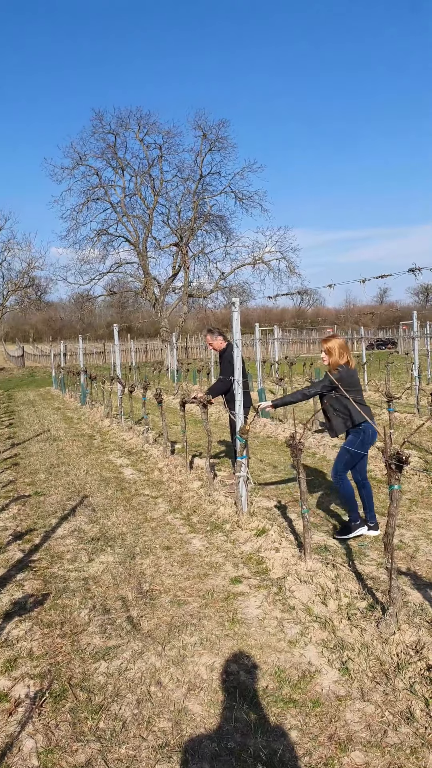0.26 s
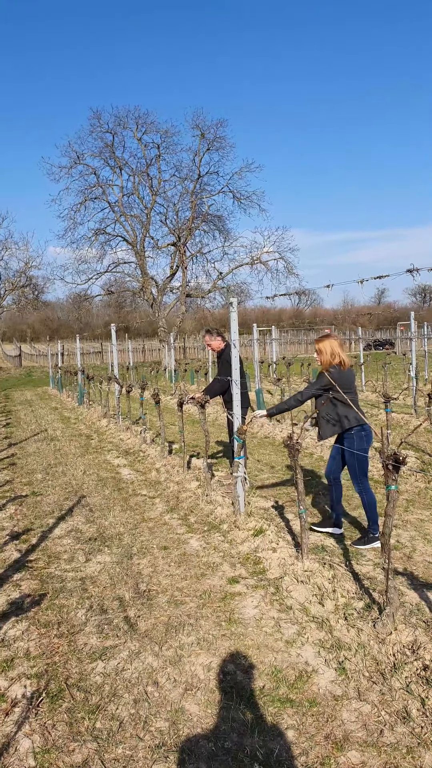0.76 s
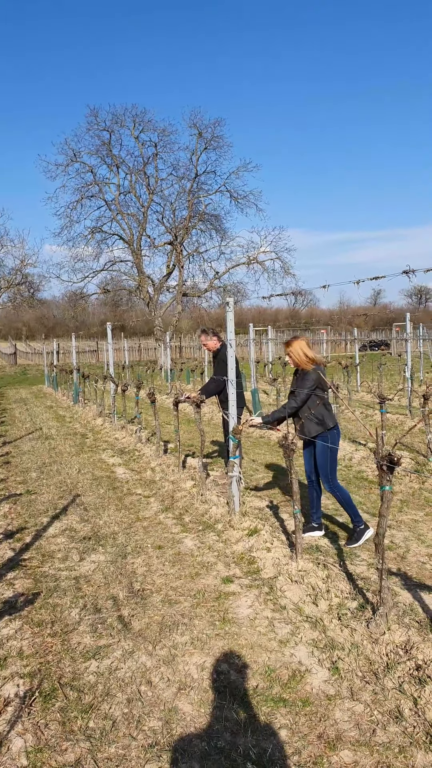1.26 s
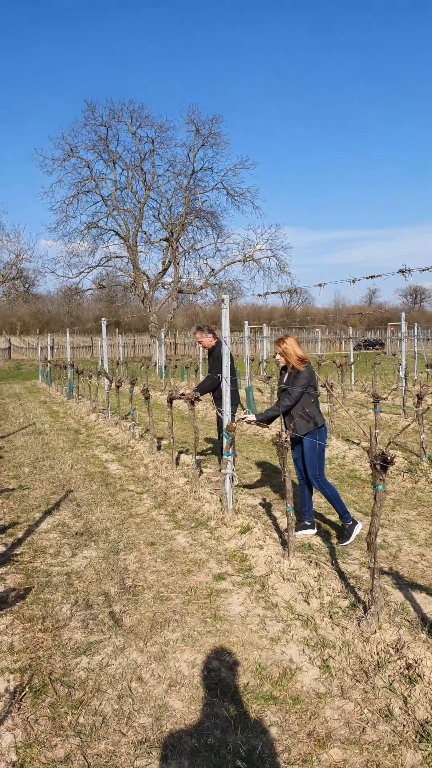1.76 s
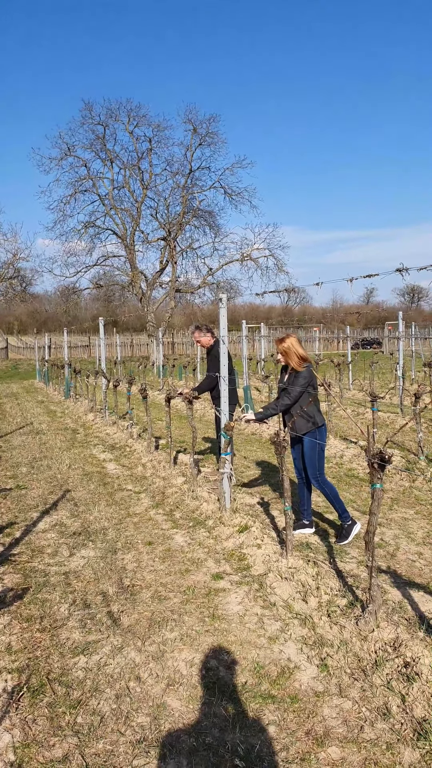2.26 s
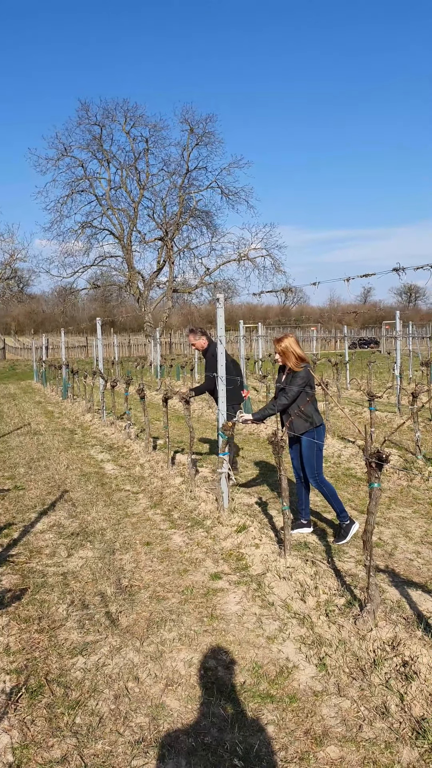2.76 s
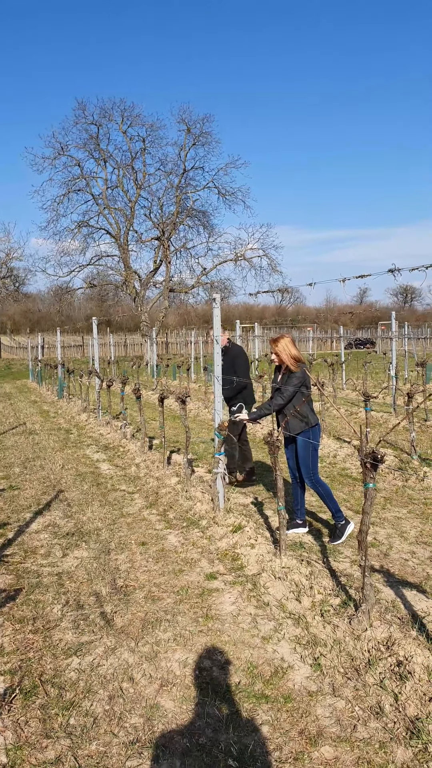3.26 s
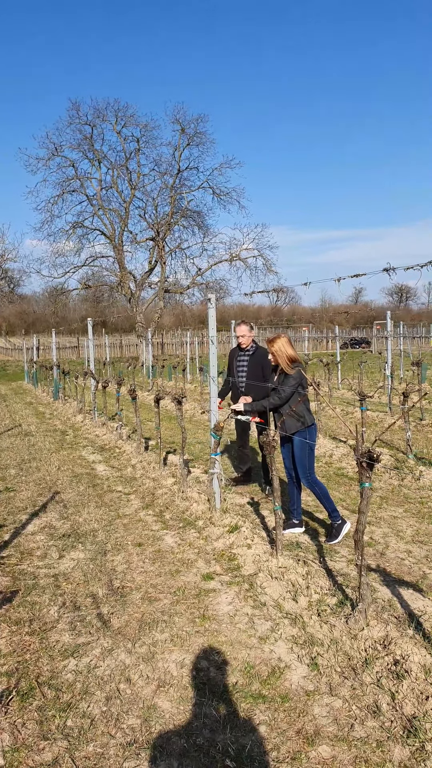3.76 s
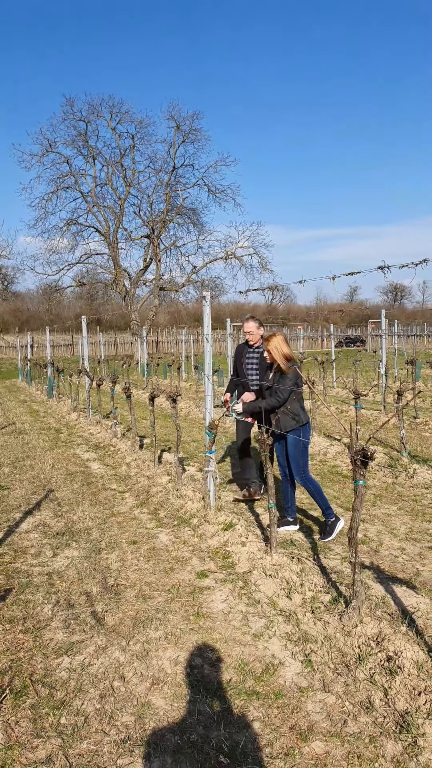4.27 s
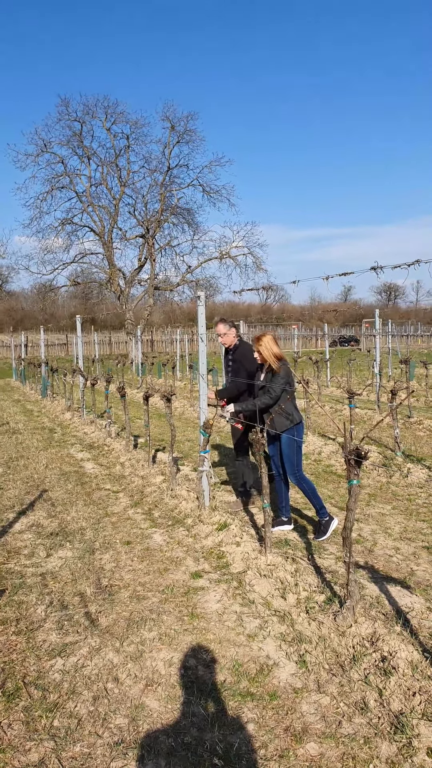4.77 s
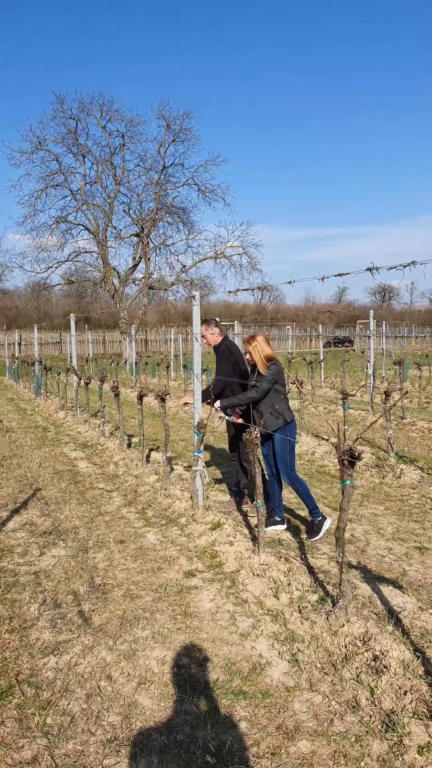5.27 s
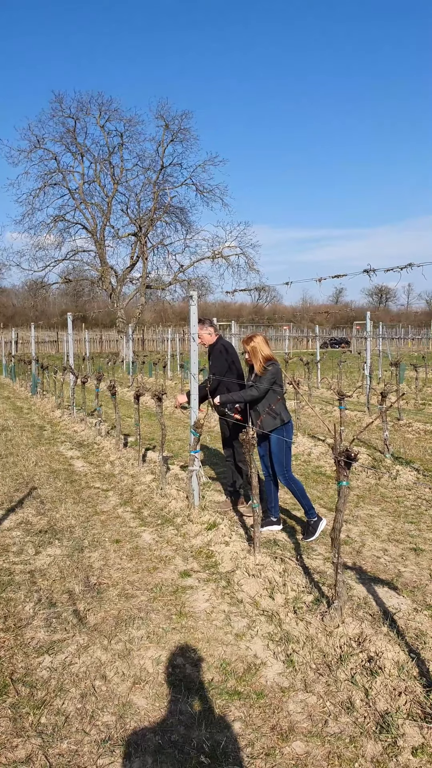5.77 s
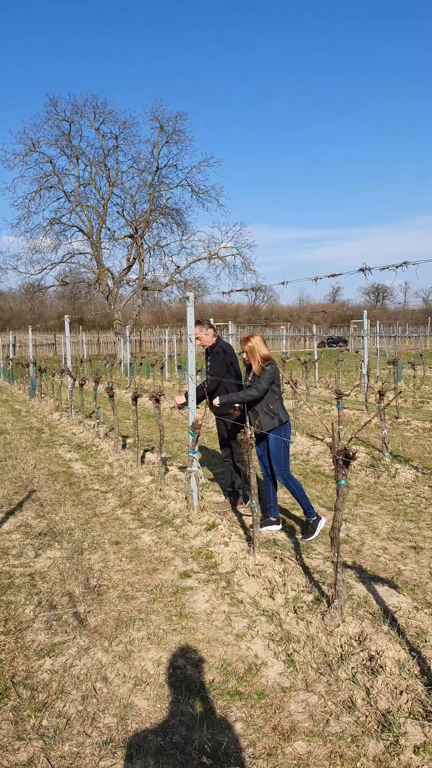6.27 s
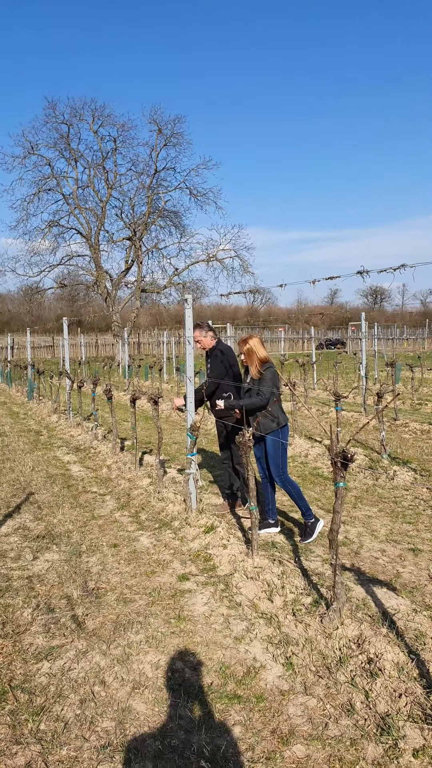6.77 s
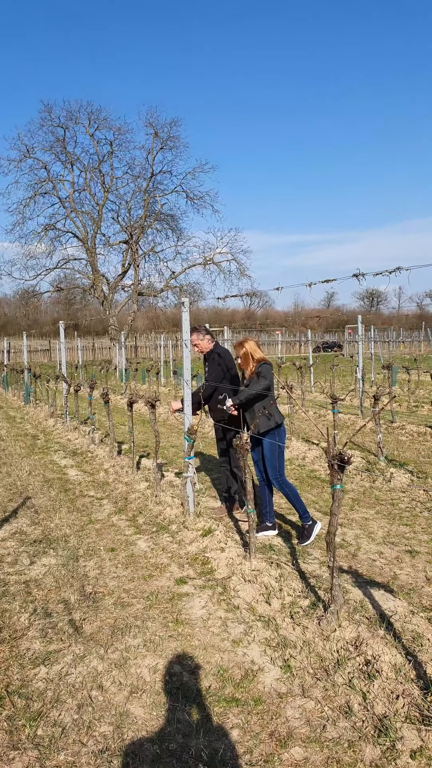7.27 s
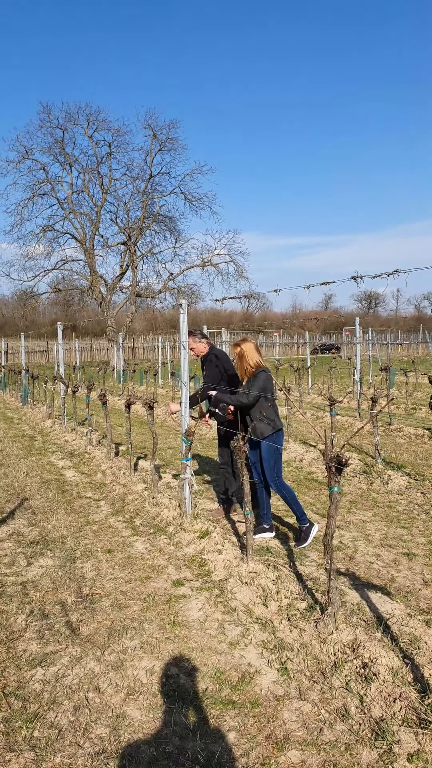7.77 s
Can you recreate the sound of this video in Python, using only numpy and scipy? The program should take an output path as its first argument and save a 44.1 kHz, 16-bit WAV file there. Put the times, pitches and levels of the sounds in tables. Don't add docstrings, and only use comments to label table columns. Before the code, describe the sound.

In an open vineyard, hand shears a few metres away cut dry canes: fibres crunch, a sharp crack, brief steel ring, short scatter. A cluster of snips comes early amid low wind thumps, then a quieter stretch with light ticks, wire scrapes and a far bird trilling. More snips follow, ending with one loud crack and crackling twigs. Phone microphone, very quiet background.

```python
import sys
import numpy as np
from scipy import signal
from scipy.fft import rfft, irfft, next_fast_len
from scipy.io import wavfile
from scipy.ndimage import uniform_filter1d

SR = 44100
rng = np.random.default_rng(int(sys.argv[2]) if len(sys.argv) > 2 else 0)


def transcribe(u):
    v = np.clip(np.atleast_2d(u).T, -1, 1)
    q = np.round(v * 32767).astype(np.int16)
    wavfile.write(sys.argv[1], SR, q)


def voltage_ratio(level):
    return 10 ** (np.asarray(level, float) / 20)


N = 353241
TIME = np.arange(N) / SR


def unit(x):
    return x / np.sqrt(np.mean(x ** 2))


def noise(shape):
    hz, db = np.transpose(shape)
    size = next_fast_len(N)
    f = np.maximum(np.arange(size // 2 + 1) * SR / size, 1)
    gain = voltage_ratio(np.interp(np.log(f), np.log(hz), db, -150, -150))
    return unit(irfft(rfft(rng.standard_normal(size)) * gain, size)[:N])


def walk(rate):
    k = int(SR / rate)
    held = np.repeat(rng.standard_normal(N // k + 1), k)
    return unit(uniform_filter1d(held, k)[:N])


def highpass(x, order, hz):
    return signal.sosfiltfilt(signal.butter(order, hz, "high", fs=SR, output="sos"), x)


def curve(points):
    return np.interp(TIME, *np.transpose(points))


def swells(rows, rise_db_s, fall_db_s):
    t = np.arange(0, N / SR, 1 / 1000)
    s, hold, db = np.array(rows)[:, :3].T[:, :, None]
    climb = rise_db_s * np.maximum(s - t, 0)
    fall = fall_db_s * np.maximum(t - s - hold, 0)
    return voltage_ratio(2 * (db - climb - fall))


def smooth(power):
    return np.interp(TIME, np.arange(len(power)) / 1000, np.sqrt(power))


# frequency in Hz, lead in radians.
PORT_PHASE = [(400, -0.46), (1300, -1.3), (2500, -0.8), (4000, -1.6), (8000, -0.75), (13000, -2.4)]
# frequency in Hz, left minus right in dB.
PORT_TILT = [(500, 6.5), (1200, 5), (2500, -7), (7000, -1), (13000, -4.5)]


def placed(x, pan_db):
    size = next_fast_len(N)
    f = np.log(np.arange(size // 2 + 1) * SR / size + 1)
    phase_hz, phase = np.transpose(PORT_PHASE)
    tilt_hz, tilt_db = np.transpose(PORT_TILT)
    lead = np.exp(1j * np.interp(f, np.log(phase_hz), phase))
    tilt = voltage_ratio(np.interp(f, np.log(tilt_hz), tilt_db))
    left = irfft(rfft(x, size) * tilt * lead, size)[:N]
    return np.array([left * voltage_ratio(pan_db / 2), x * voltage_ratio(-pan_db / 2)])


def unrelated(x):
    return np.array([np.roll(x, N // 3), np.roll(x, N // 5)])


# time in seconds, crack peak in dB, wood and blade in dB
# relative to the crack, decay t60 in seconds.
CUTS = [(1.51, -41.5, -14, 1.5, 0.025), (1.5729, -22.5, -11, -7.5, 0.024), (1.5965, -16.5, -18, -7, 0.026),
        (1.9785, -30, -25, -6, 0.034), (2.0194, -37, -19, -3.5, 0.021), (2.2215, -27, -15, -4, 0.036),
        (2.4724, -40.5, -18.5, 1.5, 0.081), (2.5139, -28.5, -9.5, 5.5, 0.059), (2.607, -17, -16, -3, 0.051),
        (2.6254, -20.5, -28, -17, .013), (3.016, -34.5, -19.5, -8, 0.036), (5.022, -30, -19, -16, 0.032),
        (6.057, -40, -11.5, 1, 0.046), (6.1077, -40.5, -17.5, -18, 0.063), (6.136, -38.5, -26, -8, 0.035),
        (6.2691, -20, -18, 1, 0.033), (6.395, -37, -21.5, -8, 0.038), (6.6809, -38.5, -25, 0.5, 0.06),
        (6.69, -35, -22.5, -2, 0.02), (7.2558, -30, -26, -1.5, 0.025), (7.263, -28.5, -18, -5, 0.04),
        (7.3383, -26.5, -9, -4, 0.045), (7.6528, -37, -15, 1.5, 0.078), (7.8025, -13, -18.5, -8, 0.03)]
CUT_EDGE_DB = [4, 3, -2, -1, -1, -2.5, -5, 2, -1, -2.5, -1.5, -7, -7.5, -3, -1, -0.5, -2.5, -1, 2.5, 2.5,
               -0.5, -1, -3, 4]
# time in seconds, crack peak in dB,
# decay t60 in seconds, scatter in dB relative to the crack.
TAPS = [(.744, -47, 0.047, -19), (1.5224, -49.5, 0.038, -10.5), (2.1924, -58, 0.024, -30.5),
        (2.5745, -48.5, 0.068, -23), (3.6677, -54.5, 0.072, -19), (3.7469, -58.5, 0.044, -28),
        (4.546, -49.5, 0.065, -16.5), (4.9598, -52.5, 0.025, -10), (4.9957, -65, 0.03, 12.5),
        (5.4098, -51.5, 0.014, -10), (6.7657, -48.5, 0.086, -48), (7.2336, -61.5, 0.021, -18),
        (7.3025, -48, 0.076, -24), (7.5788, -63, 0.045, -25), (7.5938, -43, 0.043, -26),
        (7.6894, -48.5, 0.034, -24), (7.7938, -44, 0.021, -2)]
TICKS = [(2.216, -37, .03, -22), (1.972, -36, .035, -22), (4.941, -62, .06, -15), (5.393, -66, .06, -15),
         (.8794, -45, 0.035, -19), (3.822, -52, 0.0097, -31), (4.252, -69.5, 0.037, -2),
         (5.012, -49, .02, -15), (4.636, -52, .015, -24), (7.522, -71.5, 0.043, -7),
         (1.1093, -48, 0.023, -19.5), (1.6681, -41.5, 0.014, -23.5), (4.6994, -51, 0.037, -11),
         (6.0403, -47, 0.028, -24), (7.1154, -51, 0.024, -19), (7.1269, -51.5, 0.13, -15),
         (7.1578, -44.5, 0.042, -24), (7.1744, -45, 0.06, -27), (7.954, -42, 0.068, -14.5)]
SPLINTERS = [
    (1.5765, -25.5, .012, -39.5),
    (1.565, -44.5, .03, -30),
    (2.7057, -67, 0.11, -15),
    (2.7525, -50.5, 0.019, -18),
    (2.8325, -54, 0.058, -11.5),
    (2.896, -56.5, 0.016, -32),
    (3.0644, -51, 0.034, -37),
    (5.749, -72, 0.01, -6),
]
# time in seconds, crack peak in dB.
CRACKLES = [(.2344, -74), (.2794, -78), (.5994, -77.5), (.7333, -60), (.870, -60), (0.898, -51.5),
            (2.698, -56), (2.7144, -54), (2.726, -55), (2.7364, -64), (2.7446, -59), (2.761, -63),
            (2.8463, -55), (3.69, -69), (3.79, -70), (3.855, -65), (3.92, -67.5), (4.3842, -82.5),
            (4.4944, -74), (4.560, -57), (4.5714, -64), (4.656, -63), (5.06, -54), (5.174, -70.5),
            (5.9623, -60.5), (6.364, -55), (7.5663, -70), (7.604, -55), (7.7223, -58.5), (7.76, -56),
            (7.771, -61), (7.783, -56), (7.8437, -44), (7.8577, -43.5), (7.875, -41), (7.883, -42.5),
            (7.897, -48.5), (7.9044, -50), (7.9104, -53.5)]


def contacts():
    rows = []
    for cut, edge_db in zip(CUTS, CUT_EDGE_DB):
        scatter_db = -26.5 - 0.32 * (cut[1] + 30)
        rows.append((*cut, scatter_db, edge_db))
    for table, wood_db, blade_db in ((TAPS, -9, 1), (TICKS, -30.5, -3), (SPLINTERS, -40, -13.5)):
        rows += [(s, db, wood_db, blade_db, t60, scatter_db, -1.5) for s, db, t60, scatter_db in table]
    return rows + [(s, db, -23.5, -10, 0.026, -23.5, 0.5) for s, db in CRACKLES]


# frequency in Hz, density in dB per Hz.
WOOD = [(260, -45.5), (450, -27.5), (534, -17.5), (967, -14), (1240, -15), (1540, 0.5), (1990, -3),
        (2300, -7.5), (2990, -33.5), (5060, -120)]
BLADE = [(1180, -45.5), (2000, -23), (2270, -7), (2480, -3.5), (2700, 2.5), (2990, -0.5), (3330, -1.5),
         (3700, -7.5), (4810, -46.5), (8140, -120)]
CRACK = [(1940, -31.5), (3300, -4.5), (3630, -17.5), (3930, -2), (4920, -10), (5640, -6), (6320, -2.5),
         (7500, -19), (9750, -46.5), (16500, -120)]
EDGE = [(4240, -36.5), (7200, -9.5), (7590, -8.5), (8400, 3.5), (9980, -3.5), (11700, 2.5), (12900, -4),
        (15800, -10.5), (16700, -46)]
SCATTER_T60 = [0.34, 0.3, 0.24, 0.15]


def snips():
    t = np.arange(int(.4 * SR)) / SR - .012
    age = np.maximum(t, 0)
    blow, tail = np.zeros((2, 4, N + len(t)))
    slow = np.array([[1.5], [1.15], [.95], [.8]])
    scatter = (1 - np.exp(-age / .004)) * voltage_ratio(-60 * age / np.array(SCATTER_T60)[:, None])
    crunch = voltage_ratio(-28 + 1500 * t) * (t < 0)
    for s, db, wood_db, blade_db, t60, scatter_db, edge_db in contacts():
        i = int((s + t[0] - .001) * SR)
        size = voltage_ratio(db - 5 + np.array([[wood_db], [blade_db], [-3], [-3 + edge_db]]))
        rise = 1 - np.exp(-(age / (0.025 * t60)) ** 2)
        crack = rise * voltage_ratio(-60 * age / (slow * t60))
        blow[:, i:i + len(t)] += (size * (crunch + crack)) ** 2
        tail[:, i:i + len(t)] += (size * scatter * voltage_ratio(scatter_db)) ** 2
    out, splinter = 0, unit(voltage_ratio(2 * walk(700)))
    for k, shape in enumerate((WOOD, BLADE, CRACK, EDGE)):
        carrier = noise(shape)
        direct, wide = placed(carrier, -4.0), unrelated(carrier)
        patter = unit(voltage_ratio(3.2 * walk(250)))
        echo = 1.2 * np.roll(direct, N // 2, axis=1) + 0.47 * wide
        out = out + np.sqrt(blow[k, :N]) * splinter * (direct + .2 * wide)
        out = out + np.sqrt(tail[k, :N]) * patter * echo
    return signal.sosfilt(signal.butter(4, 560, "high", fs=SR, output="sos"), out)


# time in seconds, pitch in Hz, level in dB, t60 in seconds.
RINGS = [
    (2.61, 2369, -41, .16),
    (2.61, 2789, -54, .15),
         (1.574, 6673, -27, 0.013), (1.596, 6330, -17.5, 0.011), (1.596, 3205, -23, 0.022),
         (2.479, 11820, -55, .15), (2.518, 11700, -44, 0.05), (5.024, 3414, -44, .04),
         (5.023, 6210, -44, 0.024), (5.525, 6430, -88, .15), (5.75, 6600, -60, 0.02),
         (5.75, 7500, -68, .02), (5.75, 8400, -70, .015), (6.398, 11300, -67, .1),
         (6.69, 11600, -52.5, 0.082), (7.598, 11540, -65.5, 0.1), (7.655, 11660, -53.5, 0.11),
         (7.802, 6004, -18.5, 0.015), (7.803, 2760, -25.5, 0.027), (6.269, 2650, -29.5, 0.03),
         (2.516, 3200, -38, .03), (2.608, 6500, -30, .02), (2.609, 2780, -28, .025),
         (2.624, 6100, -36, .015), (1.6, 2564, -55, 0.26), (2.221, 3050, -36, .025),
         (2.036, 10950, -66, .03), (2.078, 6300, -76, .08), (7.339, 1500, -42, .03), (7.34, 3050, -40, .03),
         (7.263, 2950, -40, .025), (1.978, 6100, -42, .02), (6.4, 2648, -61.5, 0.13)]


def blade_ring():
    age, out = np.arange(SR // 2) / SR, np.zeros(N + SR)
    for s, hz, db, t60 in RINGS:
        fade = (1 - np.exp(-age / 0.00045)) * voltage_ratio(db - 60 * age / t60)
        out[int(s * SR):][:SR // 2] += fade * np.sin(2 * np.pi * hz * age)
    return placed(out[:N] * voltage_ratio(2 * walk(60) + 4.7 * walk(550)), -9.5)


# frequency in Hz, density in dB per Hz.
TWIGS = [(290, -46), (500, -21), (1350, -25), (1540, -1), (2160, -13.5), (2890, -1), (4900, -10.5),
         (6100, -5.5), (7270, -16.5), (8930, -13.5), (15300, -21), (16500, -41.5)]
# start in seconds, hold in seconds, level in dB.
SHAKES = [(0, 0.079, -91.5), (.14, 0.09, -85), (.28, 0.038, -100.5), (.45, 0.065, -91), (.58, 0.041, -93),
          (.93, 0.21, -95.5), (1.58, 0.08, -99), (2.14, 0.082, -102), (2.66, 0.014, -87), (2.92, 0.11, -87),
          (3.68, 0.13, -78), (3.82, 0.11, -85), (4.55, 0.16, -82.5), (5.08, 0.1, -85), (6.0, 0.081, -97),
          (6.27, 0.024, -90.5), (7.27, .04, -72), (7.37, 0.028, -77.5), (7.6, 0.051, -82),
          (7.76, .25, -75.5), (5.78, .06, -104)]
SHAKE_TOP_DB = [-8, -7, -6, -1, -5, -1, -1, -1, -1, -1, -3, 1, -1, -1, -1, -1, -1, -1, -1, -1, 12]


def rustle():
    grains = unit(voltage_ratio(3 * walk(500) + 2 * walk(40)))
    carrier = noise(TWIGS)
    both = placed(carrier, -7.5) + 2.9 * unrelated(carrier)
    top = highpass(both, 4, 4300)
    power = swells(SHAKES, rise_db_s=302, fall_db_s=190)
    stir = voltage_ratio(-107)
    body = smooth(power.sum(axis=0)) + stir
    hiss = smooth(voltage_ratio(2 * np.array(SHAKE_TOP_DB)) @ power) + stir
    return voltage_ratio(-4.5) * grains * (body * (both - top) + hiss * top)


# frequency in Hz, width in Hz, level in dB.
WIRE = [(700, 45, -15), (1300, 110, -10), (1600, 45, 2.5), (3460, 50, -3), (5380, 40, -12)]
# start in seconds, hold in seconds, level in dB, then the
# fourth and fifth modes in dB relative to the third.
DRAGS = [(0.686, 0.035, -70, -12, -25), (2.175, 0.03, -69, -3, -25), (2.586, 0.034, -61, -8, -11.5),
         (3.668, 0.022, -76.5, -1, 13), (3.749, 0.021, -65.5, 5, -10), (3.796, 0.035, -67, -3.5, -4.5),
         (4.259, 0.053, -69, -3.5, -15.5), (4.551, 0.036, -75.5, -5.5, -8.5),
         (4.638, 0.036, -80.5, -6, -7.5), (4.699, 0.05, -71.5, 8, 7), (4.943, 0.052, -67.5, -7.5, -1),
         (5.169, 0.052, -82.5, -11, -12), (5.407, 0.015, -54, -6, -8.5), (7.349, 0.072, -75, 0.5, -10),
         (7.516, 0.045, -89, 7.5, -16), (7.76, 0.03, -67.5, -5.5, -11.5), (7.808, 0.07, -64, -12, -8),
         (7.968, 0.014, -73.5, -6.5, -10)]
DRAG_LOW_DB = [-14, -1, -1, -1, -1, -1, -1, 3, -1, -1, -1, -1, -1, -1, -1, -1, -1, -1]


def wire():
    power, out = swells(DRAGS, rise_db_s=3000, fall_db_s=700), 0
    mix_db = np.vstack([DRAG_LOW_DB, DRAG_LOW_DB, np.zeros(len(DRAGS)), np.array(DRAGS)[:, 3:].T])
    jerks = unit(voltage_ratio(4.5 * walk(300)))
    for (hz, width, db), mix in zip(WIRE, mix_db):
        slip = jerks * rng.standard_normal(N)
        mode = signal.iirpeak(hz, hz / width, SR)
        post = signal.iirpeak(hz, hz / (8 * width), SR)
        push = voltage_ratio(db + 2.0 * walk(45)) * smooth(voltage_ratio(2 * mix) @ power) * slip
        ringing = signal.lfilter(*mode, signal.lfilter(*post, push))
        out = out + ringing / np.sqrt(np.pi / 2 * width / (SR / 2))
    return placed(out, -3.0)


# time in seconds, peak in dB, resonance in Hz, t60 in seconds.
THUDS = [(2.13, -32.5, 385, 0.037), (1.2, -67, 680, 0.14), (3.0, -59, 670, 0.098), (4.29, -56, 371, 0.16),
         (4.545, -55, 800, 0.11), (5.03, -49.5, 316, 0.19), (5.2, -75.5, 343, 0.34),
         (5.41, -66, 784, 0.069), (5.49, -45.5, 320, 0.095), (7.34, -69, 339.7, 0.41),
         (7.34, -59.5, 696, 0.19), (7.359, -67, 1110, 0.23), (.8, -74.5, 351, 0.48),
         (2.979, -62, 263, 0.28), (4.95, -66, 640, 0.18)]


def thuds():
    out, t = np.zeros((2, N)), np.arange(int(.4 * SR)) / SR
    push = rng.standard_normal((len(THUDS), 3, len(t)))
    for (s, db, hz, t60), (both, *own) in zip(THUDS, push):
        edges = signal.butter(2, [hz * 0.79, hz * 1.095], "band", fs=SR, output="sos")
        body = unit(signal.sosfilt(edges, both + 0.93 * np.array(own)))
        i = int(s * SR)
        out[:, i:i + len(t)] += body * (1 - np.exp(-t / 0.014)) * voltage_ratio(db - 60 * t / t60)
    return out


# frequency in Hz, density in dB per Hz.
RUMBLE = [(16, -50), (27, -18), (46, -3), (65, 1), (86, 0), (115, -6.5), (150, -29), (250, -120)]
FLUTTER = [(75, -25.5), (110, -1), (170, -2), (230, -13), (300, -22), (420, -30.5), (550, -47),
           (900, -81.5)]
# start in seconds, hold in seconds, rumble in dB, flutter in dB relative to it.
LEFT_GUSTS = [(0.0, 0.012, -45.5, -27), (.27, 0.022, -50, -46), (.43, 0.1, -53, -34),
              (.56, 0.16, -36.5, -30), (.83, 0.036, -54.5, -28), (.96, 0.009, -41.5, -36),
              (1.08, 0.056, -56.5, -19), (1.18, 0.17, -33, -25.5), (1.45, 0.013, -45.5, -18),
              (1.54, 0.14, -36, -17), (1.78, 0.05, -28.5, -30.5), (1.94, 0.047, -27.5, -16),
              (2.05, 0.018, -22, -18), (2.13, 0.078, -27.5, -11.5), (2.48, 0.099, -32.5, -7),
              (2.61, 0.021, -20.5, -9.5), (2.92, 0.023, -72.5, -5), (3.56, 0.041, -67.5, -12),
              (3.69, 0.029, -78, -8.5), (4.0, 0.074, -50.5, -12.5), (4.2, 0.055, -47, -15),
              (5.58, 0.027, -52.5, -16), (5.77, .11, -31.5, -16.5), (5.96, 0.052, -31.5, -28),
              (6.09, 0.29, -36.5, -22), (6.57, 0.071, -47.5, -41), (6.73, 0.075, -54, -49.5),
              (6.93, 0.035, -47, -39.5), (7.02, 0.11, -63, -33), (7.25, 0.41, -76.5, -22)]
RIGHT_GUSTS = [(.59, 0.065, -73, -23), (.8, 0.068, -79, -6), (1.17, 0.19, -44, -21),
               (1.75, 0.068, -48.5, -20.5), (2.41, 0.014, -35.5, -4), (2.58, 0.068, -42, -20),
               (2.87, 0.19, -63.5, -6), (4.2, 0.072, -46, -16), (5.18, 0.02, -59, -16),
               (5.44, 0.082, -46.5, -10), (5.58, 0.015, -49, -14), (5.94, 0.27, -53, -26.5),
               (6.38, 0.034, -34.5, -23.5), (6.79, 0.013, -65.5, -42), (7.25, .15, -86, -1)]
# time in seconds, level in dB.
LEFT_LULL = [(0, -58), (1.051, -72), (2.3, -57), (2.63, -49), (2.649, -75.5), (3.1, -105.5), (5.3, -104),
             (5.702, -81), (6.4, -60), (7.2, -79), (8.01, -100)]
RIGHT_LULL = [(0, -66), (.5, -71), (1.099, -77.5), (1.601, -58), (2.8, -66), (3.149, -76.5), (3.3, -65),
              (3.8, -69), (4.02, -43), (4.351, -53.5), (4.85, -80.5), (5.399, -66), (5.701, -64),
              (6.5, -63), (6.75, -66.5), (7.05, -94.5), (8.01, -100)]
# time in seconds, level in dB relative to the breeze.
LULL_FLUTTER = [(0, -13.5), (.8, -7.5), (1.5, -15.5), (3, -10), (3.8, -10.5), (4.1, -16.5), (6.3, -10.5),
                (6.6, -31), (8.01, -23)]


def wind():
    ports = []
    for gusts, lull in ((LEFT_GUSTS, LEFT_LULL), (RIGHT_GUSTS, RIGHT_LULL)):
        power = swells(gusts, rise_db_s=698.5, fall_db_s=400.5)
        starts, flutter_db = np.array(gusts)[:, 0], np.array(gusts)[:, 3]
        drop_s, drop_db_s = 2.634, 3000
        since = np.maximum(np.arange(power.shape[1]) / 1000 - drop_s, 0)
        power = power * voltage_ratio(-2 * drop_db_s * np.outer(starts < drop_s, since))
        breeze = voltage_ratio(curve(lull))
        low = smooth(power.sum(axis=0)) + breeze
        high = smooth(voltage_ratio(2 * flutter_db) @ power) + breeze * voltage_ratio(curve(LULL_FLUTTER))
        rumble = noise(RUMBLE)
        envelope = np.abs(signal.hilbert(rumble, next_fast_len(N))[:N])
        rumble = unit(rumble / (envelope + 0.28) ** 0.39)
        rasp = high * voltage_ratio(28) * noise([(1.6 * hz, db) for hz, db in FLUTTER])
        flutter = high * voltage_ratio(4 * walk(30)) * (noise(FLUTTER) + rasp)
        ports.append(voltage_ratio(2.0 * walk(16)) * (low * rumble + flutter))
    return np.array(ports)


# time in seconds, peak in dB.
TRILL = [(3.98, -78.5), (4.05, -58), (4.24, -52.5), (4.6, -54), (4.85, -59), (4.95, -60.5), (5.15, -57.5),
         (5.3, -55), (5.38, -59.5), (5.46, -55), (6.1, -54.5), (6.2, -74), (6.34, -59.5), (6.42, -68)]
# time in seconds, pitch in Hz.
NOTE = [(0, 2450), (.008, 2720), (.016, 2910), (.021, 2980), (.026, 2900), (.031, 2700), (.035, 2500)]


def bird():
    t = np.arange(int(NOTE[-1][0] * SR)) / SR
    k = np.arange(35)
    starts = 3.983 + .066 * k + .00033 * k ** 2 / 2
    calls, vary = np.zeros(N), rng.standard_normal((len(k), 3))
    levels = np.interp(starts, *np.transpose(TRILL)) + 1.6 * vary[:, 1]
    for s, db, v, lean in zip(starts, levels, vary[:, 0], vary[:, 2]):
        sag = .012 * (s - 4.8)
        hz = np.interp(t, *np.transpose(NOTE)) * (1 + .008 * v - sag)
        swell = np.sin(np.pi * (t / t[-1]) ** (1.05 + .3 * np.tanh(lean))) ** 1.1
        i = int((s - .009) * SR)
        calls[i:i + len(t)] += voltage_ratio(db) * swell * np.sin(2 * np.pi * np.cumsum(hz) / SR)
    age = np.arange(int(.3 * SR)) / SR
    scatter = rng.standard_normal((2, len(age))) * voltage_ratio(-36 - 60 * age / 0.33)
    calls = calls * voltage_ratio(-1 + 2.2 * walk(150))
    return placed(calls, -0.95) + signal.fftconvolve(calls[None], scatter, axes=1)[:, :N]


# start in seconds, end in seconds, pitch in Hz, level in dB.
PEEPS = [
    (.7, .75, 4650, -92),
    (.95, 1.09, 3760, -92),
    (1.155, 1.23, 4620, -89),
    (1.46, 1.51, 3720, -86),
]


def peeps():
    out = np.zeros(N)
    for start, end, hz, db in PEEPS:
        t = np.arange(int((end - start) * SR)) / SR
        whistle = np.sin(2 * np.pi * hz * (t + .08 * t ** 2))
        out[int(start * SR):][:len(t)] += voltage_ratio(db) * np.sin(np.pi * t / t[-1]) * whistle
    return np.array([out, out])


# frequency in Hz, density in dB per Hz.
AIR = [(120, -33.5), (200, -2), (926, -13), (1640, -11.5), (2090, -15.5), (2910, -7.5), (3700, -25),
       (5980, -22), (7190, -34.5), (16500, -32.5)]
# time in seconds, level in dB.
AIR_OPEN = [(0, 1.5), (.3, 1.5), (1.4, -1), (3.0, -1), (3.2, -5), (3.6, -4), (4.5, -1), (7.0, -1.5),
            (8.01, -1)]


def air():
    return voltage_ratio(-87 - 4.5 + curve(AIR_OPEN) + 2 * walk(2)) * unrelated(noise(AIR))


def scene():
    return snips() + blade_ring() + rustle() + wire() + thuds() + wind() + bird() + peeps() + air()


def roll_off(x):
    return signal.sosfilt(signal.butter(12, 16820, fs=SR, output="sos"), x)


TOP_HZ = [12300, 13800, 15000, 16200]
TOP_OPEN_DB = [-74.5, -68.5, -63, -41.5]


def record(dry):
    tops = [highpass(dry, 8, hz) for hz in TOP_HZ]
    keep = np.exp(-1 / (.012 * SR))
    treble = uniform_filter1d(np.mean(tops[0] ** 2, axis=0), size=512)
    power = signal.lfilter([1 - keep], [1, -keep], treble)
    wet = dry * np.minimum(TIME / .008, 1)
    for top, above, open_db in zip(tops, tops[1:] + [0], TOP_OPEN_DB):
        wet = wet - (top - above) / (1 + (power / voltage_ratio(2 * open_db)) ** 2)
    limit = .9
    return roll_off(limit * np.tanh(wet / limit))


dry = scene()
out = record(dry)
transcribe(out)
```